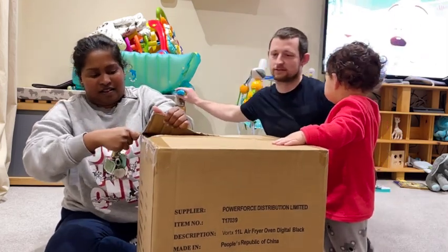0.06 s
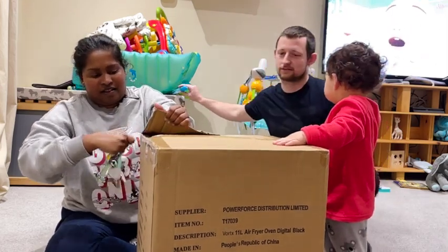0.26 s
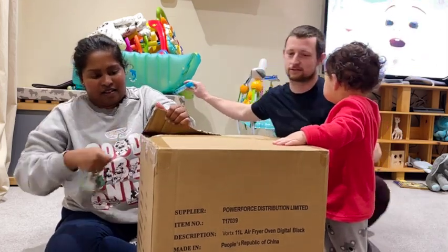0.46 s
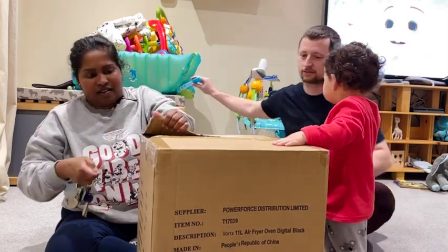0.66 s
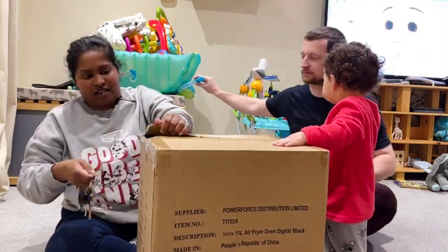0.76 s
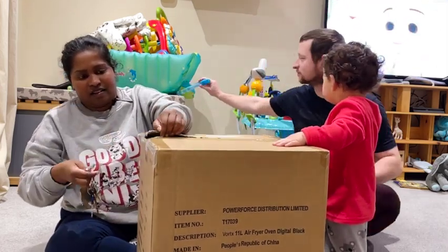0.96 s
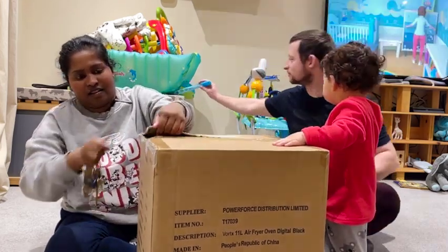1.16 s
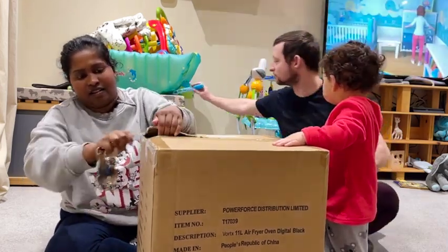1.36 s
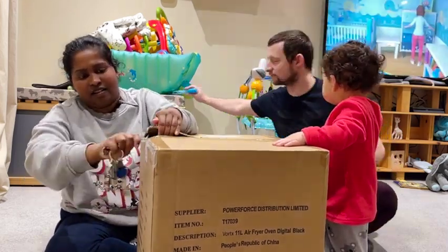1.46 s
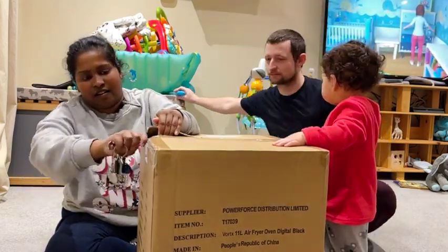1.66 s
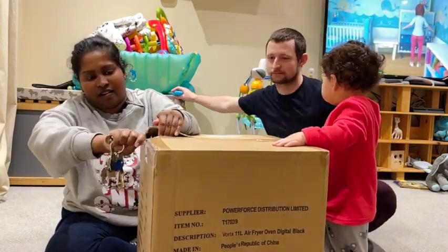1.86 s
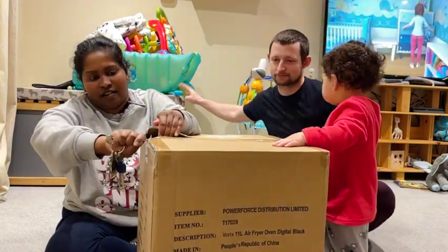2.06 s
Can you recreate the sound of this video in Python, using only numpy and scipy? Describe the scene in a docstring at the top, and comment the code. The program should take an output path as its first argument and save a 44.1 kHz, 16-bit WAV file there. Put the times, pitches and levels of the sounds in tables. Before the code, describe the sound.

A bunch of keys clinks sharply up close, with a cardboard crack, soft scrapes and small ticks

```python
"""Keys clink in quick irregular clashes close to the microphone, beside a cardboard box in a living room.
A taped flap cracks loose, a hand slides over the cardboard, then a key tip picks at the tape in dry ticks.
The keys are sums of dying sine modes with noise clicks; flap, tape and low thumps are noise puffs with
brief modes. Hands on cardboard are noise of uneven grain; a short room tail and quiet noise lie beneath."""
import sys
import numpy as np
from scipy import signal
from scipy.fft import rfft, irfft, next_fast_len
from scipy.io import wavfile
from scipy.ndimage import uniform_filter1d, map_coordinates

SR = 44100
rng = np.random.default_rng(int(sys.argv[2]) if len(sys.argv) > 2 else 0)


def store_pcm(level_fs):
    """Save levels as 16-bit WAV."""
    pcm = np.round(np.clip(level_fs, -1, 1) * 32767).astype(np.int16)
    wavfile.write(sys.argv[1], SR, np.atleast_2d(pcm).T)


N = 92610  # samples, 2.1 s


def amp(db):
    """Decibels to gain."""
    return 10 ** (np.asarray(db) / 20)


def unit(x):
    """x at rms 1."""
    return x / np.sqrt(np.mean(x ** 2) + 1e-20)


def along(points, hz):
    """Read (f/Hz, value) points on a log frequency axis."""
    f, value = np.transpose(points)
    return np.interp(np.log(hz + 1), np.log(f + 1), value)


def level(rows):
    """Smoothed gain per sample from (t/s, level/dB) rows, silent outside them."""
    s, db = np.transpose(rows)
    curve_db = np.interp(np.arange(N) / SR, s, db, left=-120, right=-120)
    return uniform_filter1d(amp(curve_db), size=300)


def tilted(spectrum, hz, tilt_db):
    """Gain of a spectrum with a brightness tilt in dB per octave above 300 Hz."""
    return amp(along(spectrum, hz) + tilt_db * np.log2(np.maximum(hz, 300)))


def colour(x, spectrum, tilt_db=0):
    """x shaped by a tilted spectrum, at rms 1."""
    hz = np.fft.rfftfreq(len(x), 1 / SR)
    return unit(irfft(rfft(x) * tilted(spectrum, hz, tilt_db), len(x)))


def add(track, s, sound):
    """Mix a sound in at a time."""
    i = max(round(s * SR), 0)
    track[i:i + len(sound)] += sound[:max(N - i, 0)]


def wander(size, per_s):
    """Random curve joining normal draws by straight lines, per_s draws each second."""
    return map_coordinates(rng.standard_normal(size), [np.arange(size) / SR * per_s], order=1)


def burst(spectrum, t60, tilt_db=0):
    """A dying puff of noise that rings through a minimum-phase spectrum."""
    size = 16384
    t, hz = np.arange(size) / SR, np.fft.rfftfreq(size, 1 / SR)
    gain = unit(tilted(spectrum, hz, tilt_db))
    # folding the cepstrum packs the filter's energy at its start
    cepstrum = irfft(np.log(gain + 1e-6))
    cepstrum[1:size // 2] *= 2
    cepstrum[size // 2 + 1:] = 0
    attack = 1 - np.exp(-t / 0.0006)
    puff = rng.standard_normal(size) * amp(-60 * t / max(t60, .002)) * attack
    return irfft(rfft(puff) * np.exp(rfft(cepstrum)))[:SR // 3]


def damped(modes):
    """The ring of (f/Hz, level/dB, t60/s) modes after one blow: dying sines."""
    t = np.arange(SR // 3) / SR
    hz, db, t60 = np.transpose(modes)[:, :, None]
    return (amp(db - 60 * t / t60) * np.sin(2 * np.pi * hz * t)).sum(axis=0)


def snaps(rows, spectrum, modes):
    """Short dry sounds: each a puff and a brief ring."""
    out = np.zeros(N)
    for s, db, *shape in rows:
        add(out, s, amp(db) * (burst(spectrum, *shape) + damped(modes)))
    return out


def stroke_gain(strokes):
    """Gain per sample: each stroke swells, holds and fades."""
    t, gain = np.arange(N) / SR, np.zeros(N)
    for s, rise, hold, release, db in strokes:
        corners = np.cumsum([s, rise, hold, release])
        gain += amp(db) * np.interp(t, corners, [0, 1, 1, 0]) ** 1.39
    return gain


def rub(strokes, spectrum, grain_db, grains_per_s):
    """Friction made of tiny slips of uneven size: noise with a flickering level."""
    slips = amp(grain_db * wander(N, grains_per_s))
    return stroke_gain(strokes) * colour(slips * rng.standard_normal(N), spectrum)


# spectrum of the quiet room: f/Hz, relative level/dB per Hz
FLOOR = [(25, -6), (253, -6.5), (509, 1.5), (1270, -8.5), (3720, -12.5), (4600, -27), (5730, -17.5),
         (15500, -33.5)]
FLOOR_DB = -47  # rms


def room_floor():
    """The room at rest: steady coloured noise."""
    return amp(FLOOR_DB) * colour(rng.standard_normal(N), FLOOR)


# decay of the room across the spectrum: f/Hz, t60/s
ROOM = [(200, 0.37), (3000, 0.36), (14000, 0.19)]
ROOM_DB = -21.5  # tail against the direct sound


def room(x):
    """The short tail of a carpeted room: noise whose bands die at their own rates, 5 ms late."""
    hz, t, bands = signal.stft(rng.standard_normal(SR // 2), SR, nperseg=256)
    dying = bands * amp(-60 * t / along(ROOM, hz)[:, None])
    tail = signal.istft(dying, SR, nperseg=256)[1]
    late = np.pad(x, (SR // 200, 0))
    return amp(ROOM_DB) * signal.fftconvolve(late, tail / np.linalg.norm(tail))[:N]


# the whole box flexes under the hands: t/s, rise/s, hold/s, release/s, level/dB
FLEXES = [(.215, 0.019, 0.0072, 0.083, -33), (1.08, 0.17, 0.13, .04, -50), (1.58, .03, 0.33, 0.11, -54)]
# spectrum of the flexing walls: f/Hz, relative level/dB per Hz
FLEX_TONE = [(25, -16), (65, -12.5), (125, 5.5), (160, -6.5), (220, -3.5), (500, -16.5), (2000, -48)]


def box_flexes():
    """Flexing walls give a low, slowly uneven rumble."""
    return rub(FLEXES, FLEX_TONE, grain_db=5.5, grains_per_s=32)


# a palm slides softly over the box: t/s, rise/s, hold/s, release/s, level/dB
SLIDES = [(.6, 0.12, 0.077, 0.54, -38)]
# spectrum of the palm on cardboard: f/Hz, relative level/dB per Hz
SLIDE_TONE = [(100, -34), (200, -8.5), (400, 3), (600, -6.5), (2000, -2), (2750, -10), (3700, -3.5),
              (4900, -21.5), (15000, -26.5)]


def palm_slide():
    """Skin on cardboard: soft friction noise."""
    return rub(SLIDES, SLIDE_TONE, grain_db=2.5, grains_per_s=400)


# scrapes over the cardboard: t/s, rise/s, hold/s, release/s, level/dB
SCRAPES = [(.07, 0.02, 0.26, .12, -48), (1.025, .06, 0.023, 0.05, -30.5), (1.181, 0.0083, 0.02, 0.046, -28),
           (1.21, 0.037, 0.0071, 0.12, -32), (1.855, 0.022, 0.011, 0.018, -44.5),
           (1.95, 0.024, 0.0087, 0.1, -44.5)]
# spectrum of the scraped surface: f/Hz, relative level/dB per Hz
SCRAPE_TONE = [(100, -14.5), (330, -14.5), (500, -5.5), (900, -6.5), (2400, 1.5), (2900, -10.5),
               (3800, -6.5), (4700, -31.5), (9500, -14.5), (14000, -62)]


def scrapes():
    """Fine-grained friction noise in short strokes."""
    return rub(SCRAPES, SCRAPE_TONE, grain_db=2.5, grains_per_s=980)


# spectrum of fibres that catch and snap under a scrape: f/Hz, relative level/dB per Hz
CRACKLE = [(300, -31), (1800, 5.5), (9500, -5.5), (15000, -23)]
CRACKLE_DB, CRACKLE_PER_S = -8, 650  # level against the scrape; mean rate of catches


def crackle():
    """Cardboard fibres catch and snap while a scrape lasts: random tiny puffs."""
    catches = (rng.random(N) < CRACKLE_PER_S / SR) * rng.standard_normal(N)
    grains = signal.fftconvolve(catches, burst(CRACKLE, t60=0.009))[:N]
    return amp(CRACKLE_DB) * stroke_gain(SCRAPES) * unit(grains)


# dull low thumps: knocks on the box, and at .457 the overloaded clash's thump:
# t/s, level/dB, t60/s of the puff
THUMPS = [(.113, -30, 0.063), (.457, -29, 0.024), (1.2495, -23.5, 0.071), (1.364, -42.5, .05)]
# spectrum of the thumps: f/Hz, relative level/dB per Hz
THUMP_TONE = [(30, -15.5), (120, -2), (320, 6.5), (600, -1), (2000, -20)]
# low mode under the thumps: f/Hz, relative level/dB, t60/s
THUMP_MODES = [(292, -7.5, 0.09)]


def low_thumps():
    """Each thump is a dull puff over one short low mode."""
    return snaps(THUMPS, THUMP_TONE, THUMP_MODES)


# cracks of the taped flap: t/s, level/dB, t60/s of the puff, brightness/dB per octave
CRACKS = [(.111, -29, 0.066, 7), (.1155, -20.5, 0.042, 0.5), (.136, -27.5, 0.057, -0.5),
          (.207, -16.5, 0.018, 2), (.212, -4.5, 0.013, -3), (.2158, 1.5, 0.015, -3.5), (.229, -21, 0.1, 3),
          (.2415, -6.5, 0.012, 7), (.255, -24, 0.1, 5)]
# spectrum of the flap: f/Hz, relative level/dB per Hz
FLAP = [(40, -55.5), (340, -19), (520, 1), (730, -0.5), (890, -5.5), (1050, -3), (1400, -7), (3600, -16.5),
        (4700, -24.5), (15000, -52)]
# modes of the flap: f/Hz, relative level/dB, t60/s
FLAP_MODES = [(546.6, -17, 0.061), (693, -12, 0.037), (1026, -12.5, 0.031), (1320, -15, 0.034)]


def flap_cracks():
    """The taped flap cracks loose: mid-heavy puffs over the board's short modes."""
    return snaps(CRACKS, FLAP, FLAP_MODES)


# ticks of the key tip on the tape: t/s, level/dB, t60/s of the puff, brightness/dB per octave
TICKS = [(1.158, -33, 0.013, -2), (1.342, -34.5, .012, 4.5), (1.3945, -34, 0.017, 13.5),
         (1.431, -31.5, 0.035, -3), (1.437, -31, 0.023, 4.5), (1.4993, -25, 0.011, 0.5),
         (1.528, -37, 0.03, 0.5), (1.6285, -24, 0.014, 10.5), (1.6735, -34, 0.041, 0),
         (1.7605, -28, 0.016, 6.5), (1.7645, -12, 0.0035, 2), (1.8412, -29, 0.01, 8)]
# spectrum of the picked tape: f/Hz, relative level/dB per Hz
TAPE = [(150, -24), (500, 6), (1200, -4), (1900, 8), (3000, -9.5), (4500, -6), (8000, -12.5), (15000, -43)]
# modes of the tape: f/Hz, relative level/dB, t60/s
TAPE_MODES = [(1940, -15, 0.0089), (2910, -3.5, 0.011)]


def tape_ticks():
    """A key tip picks at the tape: small dry puffs with very short modes."""
    return snaps(TICKS, TAPE, TAPE_MODES)


FLUTTER_DB, FLUTTER_PER_S = 3, 140  # spread of the level; random draws per second


def flutter(modes, t):
    """Each mode's level in dB flutters as neighbouring keys touch."""
    return FLUTTER_DB * np.array([wander(len(t), FLUTTER_PER_S) for _ in modes])


SHIMMER_HZ = (4800, 15080)
SHIMMER_DB, SHIMMER_T60_S = -23.5, 0.1  # mean level; decay at ring length 1


def shimmer(length, count=12):
    """Further high overtones, drawn afresh with the point of contact."""
    t60 = SHIMMER_T60_S * max(length, .05)
    overtones = [(rng.uniform(*SHIMMER_HZ), SHIMMER_DB + rng.normal(0, 2.5), t60) for _ in range(count)]
    return damped(overtones)


# modes of three keys, one list per key: f/Hz, relative level/dB, t60/s at ring length 1
KEY_MODES = [
    [(3030, -8, 0.094), (3137, -2.5, 0.11), (3315, -12, 0.042), (3527, -1, 0.037), (6740, -17, 0.084),
     (6870, -15, 0.092), (10200, -16.5, 0.043), (12300, -7.5, 0.0083), (14420, -30, 0.07)],
    [(3974, 0.5, 0.11), (4890, -14.5, 0.08), (5028, -13, 0.11), (5123, -7, 0.13), (5207, -8, 0.03),
     (8440, -7, 0.091), (9030, -12.5, .04), (14753, -25.5, .15)],
    [(5360, -4.5, 0.08), (5670, -0.5, 0.14), (5860, -1.5, 0.096), (5770, -7, 0.065), (5942, 0.5, 0.082),
     (6130, -4, 0.04), (12580, -6, .07), (13240, 2, 0.033), (14200, 4, 0.059), (14080, -17.5, 0.056)],
]
GRIP_DETUNE = 0.0015  # relative spread: the grip shifts the modes a little from clash to clash
RING_ROUGH = 0.28  # random phase drift, rad in the first ms
RING_SCATTER_DB = 2.5  # spread of each mode's level


def ring(key_db, tilt_db, length):
    """The keys' modes after one contact; loose keys touch, so the tones are slightly rough."""
    t = np.arange(SR // 3) / SR
    struck_modes = [(f, db + struck, life)
                    for modes, struck in zip(KEY_MODES, key_db) for f, db, life in modes]
    hz, db, t60 = np.transpose(struck_modes)[:, :, None]
    scatter_db = RING_SCATTER_DB * rng.standard_normal(hz.shape)
    gain_db = db + tilt_db * np.log2(hz / 6000) + scatter_db + flutter(hz, t)
    steps = rng.standard_normal((len(hz), len(t)))
    drift = RING_ROUGH * np.cumsum(steps, axis=1) / np.sqrt(SR / 1000)
    hz = hz * (1 + GRIP_DETUNE * rng.standard_normal(hz.shape))
    start = rng.uniform(0, 2 * np.pi, hz.shape)
    envelope = amp(gain_db - 60 * t / (t60 * max(length, .05)))
    tones = envelope * np.sin(2 * np.pi * hz * t + drift + start)
    return tones.sum(axis=0) * (1 - np.exp(-t / 0.00072))


# spectrum of the contact click: f/Hz, relative level/dB per Hz
CLICK = [(300, -63.5), (1500, 0), (3000, 11), (4500, -1), (5800, 13), (7500, -9), (9500, 8.5), (15000, -4)]
CLICK_T60_S = 0.01  # at ring length 1
ONSET_DB = -8  # against the contact click
# clashes in the bunch: t/s, level/dB of key 0, of key 1, of key 2, of the contact click,
# brightness/dB per octave, ring length as a share of the modes' t60
CLINKS = [(.038, -52, -29, -36, -32, 0, 0.086), (0.0568, -22, -30, -36, -23, 10, 0.23),
          (0.243, -33, -30.5, -36, -11, -14, 0.78), (.253, -24.5, -29, -32.5, -37, 4.5, 1.8),
          (0.2994, -10, -26, -41, -12, 3.5, .95), (0.327, -14.5, -40, -29.5, -17, 8.5, 0.7),
          (0.3621, -21.5, -30, -34, -22, 3, 1.7), (0.3665, -28, -35, -36, -22, 2, .9),
          (.374, -24, -42, -30, -17.5, -2.5, 0.55), (0.3915, -8, -21, -18, -6, 1, 0.4),
          (.414, -32, -28, -26, -13, 6, 0.63), (0.4253, -15, -12.5, -13, -8, -1, 0.22),
          (0.434, -10, -35, -13, -7, 7.5, .45), (.447, -40, -32, -35, -7, -5, 0.42),
          (0.4555, -17, -27, -2, 0.5, -2, 0.23), (0.46, -7.5, -6, -32, -3.5, 10.5, 1.04),
          (.468, -8, -30, -20, -23, -1, 0.47), (0.4774, -16, -23.5, -19, -7, -1, 0.84),
          (0.4945, -39, -15, -25, -6, -8.5, 0.39), (0.5063, -11, -8, -17.5, -5.5, -4, 0.64),
          (0.556, -46, -47, -40, -34, -2, 0.12), (.586, -46, -68, -64, -31, -9, 1.7),
          (.633, -45.5, -48, -46, -20, 0, 1.7), (0.653, -40, -31.5, -59, -23, 4.5, 1.9),
          (0.671, -41, -40, -56, -34, 5, 0.77), (.712, -28.5, -33.5, -61, -19.5, 0, 1.6),
          (0.957, -36, -29.5, -48, -23.5, 2, 0.34), (1.282, -39, -46, -35.5, -21, 5, 0.17),
          (1.6103, -32.5, -38, -46, -26, 6, 1.1), (1.6269, -48, -41.5, -55, -32, 6.5, 2.4),
          (1.638, -46, -34, -45, -20, -12, 0.22), (1.65, -39, -38, -32.5, -26.5, -6.5, 0.35),
          (1.7992, -46, -50, -53, -37, -9, 1.1), (2.021, -59, -51, -51, -37, 7.5, 1),
          (2.036, -44, -53, -55, -41, -7.5, 0.81), (2.05, -59, -54, -52, -47, 7, 0.42)]


def clashes():
    """Keys click and ring, each clash with a slightly softened onset."""
    out = np.zeros(N)
    for s, a_db, b_db, c_db, click_db, tilt_db, length in CLINKS:
        click_t60 = CLICK_T60_S * np.sqrt(max(length, .05))
        contact = burst(CLICK, click_t60, tilt_db) + shimmer(length)
        add(out, s, ring([a_db, b_db, c_db], tilt_db, length) + amp(click_db) * contact)
        # the onset is a weaker burst 1 to 2 ms ahead
        onset = burst(CLICK, CLICK_T60_S, tilt_db + 4.0)
        add(out, s - rng.uniform(0.00092, 0.001932), amp(click_db + ONSET_DB) * onset)
    return out


# light rattle within the bunch: t/s, level/dB before the overall rattle gain
JOSTLE = [(.213, -23.5), (.25, -33.5), (.4, -21.5), (.47, -15.5), (.56, -32.5), (.6, -36), (.66, -36),
          (.73, -32), (.79, -51)]
JOSTLE_DB, JOSTLE_PER_S = -4.5, 230  # overall rattle gain; mean rate of touches


def jostle(count=4):
    """Many light touches rattle between the clashes, shared among a few kinds of contact."""
    rattle = np.zeros(N)
    for _ in range(count):
        touches = (rng.random(N) < JOSTLE_PER_S / count / SR) * rng.standard_normal(N)
        contact = burst(CLICK, t60=0.042) + shimmer(0.33)
        touch = ring([-2, -2, -2], tilt_db=-5.5, length=0.46) + 3 * contact
        rattle += signal.fftconvolve(touches, touch)[:N]
    return amp(JOSTLE_DB) * level(JOSTLE) * unit(rattle)


def keys():
    """The shaken bunch: separate clashes over a light rattle."""
    return clashes() + jostle()


def scene():
    """Keys, box and hands over the room's quiet noise; only the hits feed the room tail."""
    hands = box_flexes() + palm_slide() + scrapes() + crackle() + crackle()
    hits = low_thumps() + flap_cracks() + tape_ticks() + keys()
    return (room_floor() + hands + room(hits) + hits)[None]


CLIP_TOP = 0.92  # mean overload ceiling, full scale 1
OVERLOAD_SKEW = 0.028  # the negative half of the wave flattens sooner
TOP_HZ = 15750  # band limit


def record(dry):
    """The loudest clashes overload the microphone; nothing is kept above the band limit."""
    top = CLIP_TOP * (1 + OVERLOAD_SKEW * np.sign(dry))
    clipped = dry / (1 + np.abs(dry / top) ** 6) ** (1 / 6)
    m = next_fast_len(N + SR // 4)
    kept = np.fft.rfftfreq(m, 1 / SR) < TOP_HZ
    return irfft(rfft(clipped, m) * kept, m)[:, :N]


dry = scene()
out = record(dry)
store_pcm(out)
```